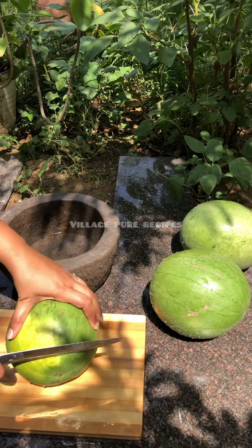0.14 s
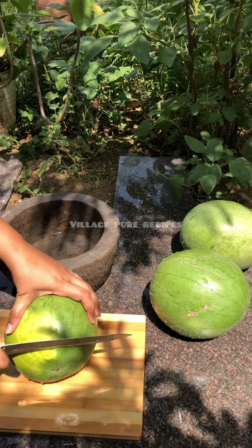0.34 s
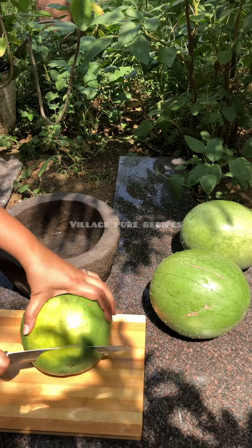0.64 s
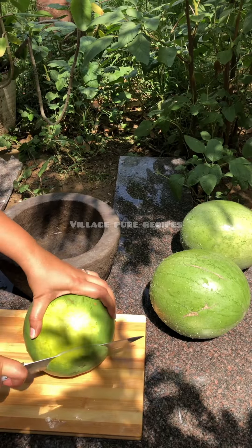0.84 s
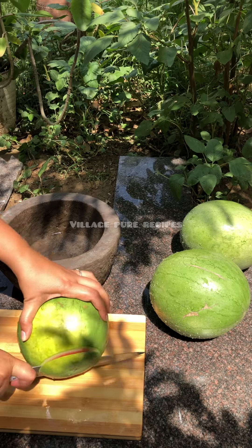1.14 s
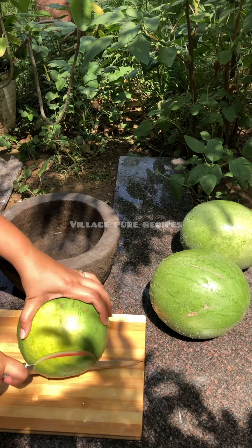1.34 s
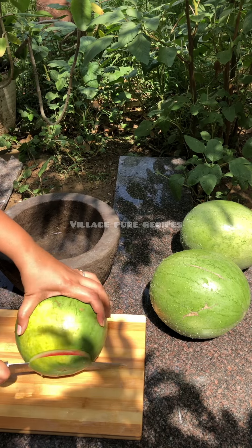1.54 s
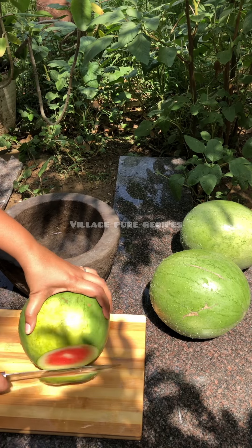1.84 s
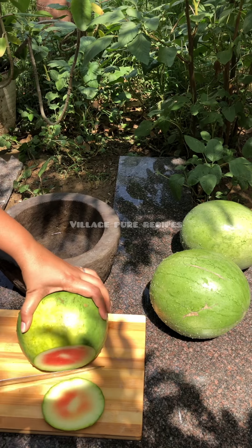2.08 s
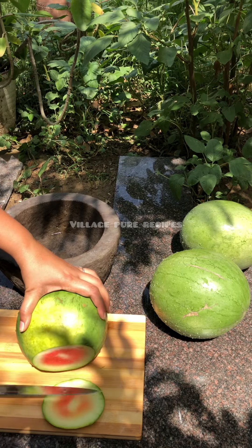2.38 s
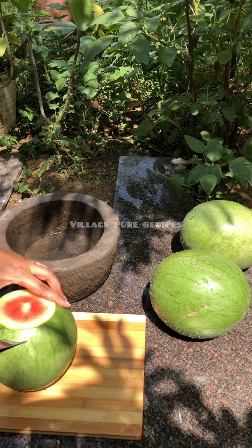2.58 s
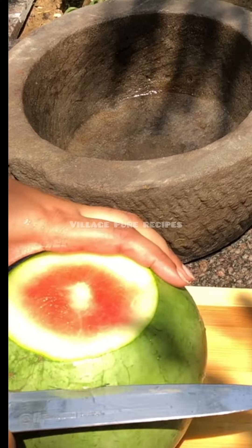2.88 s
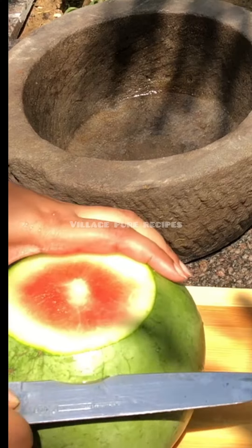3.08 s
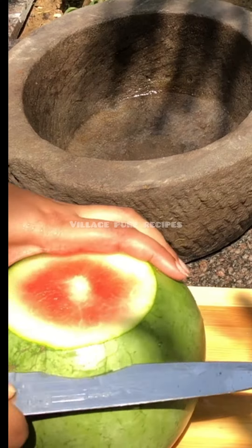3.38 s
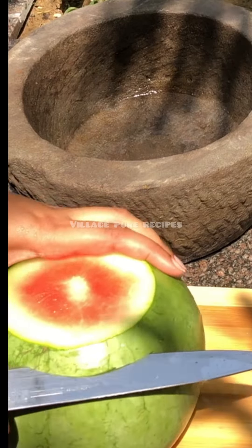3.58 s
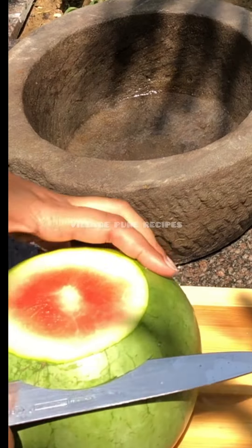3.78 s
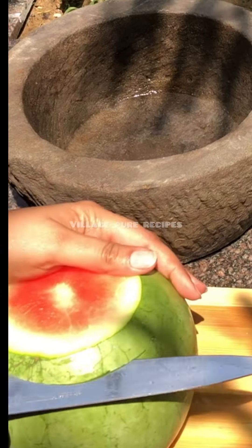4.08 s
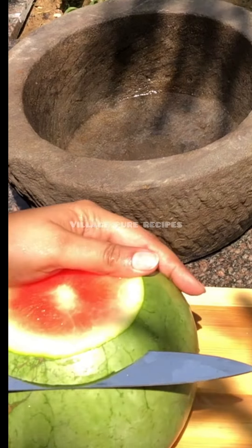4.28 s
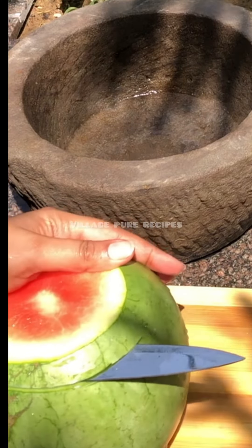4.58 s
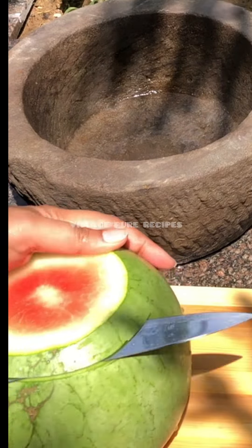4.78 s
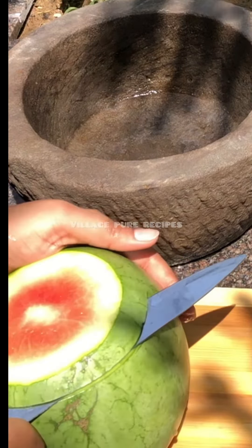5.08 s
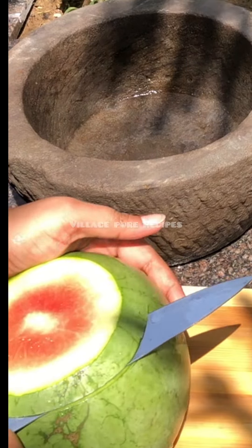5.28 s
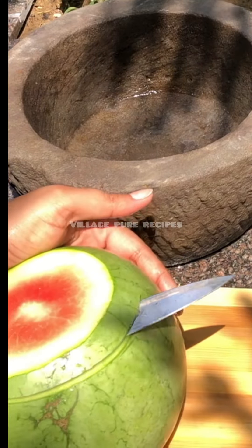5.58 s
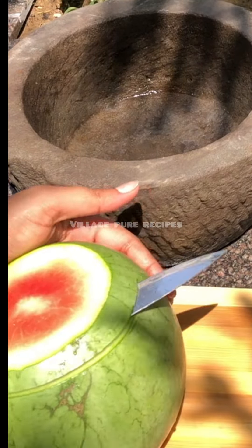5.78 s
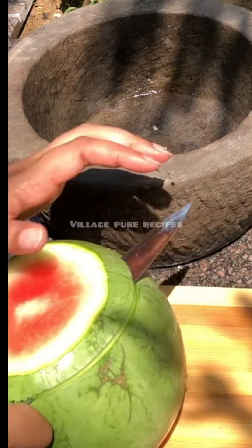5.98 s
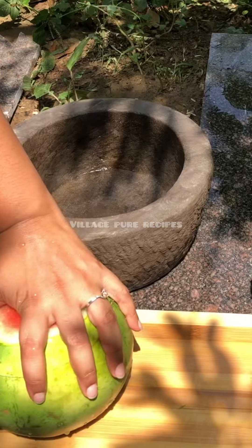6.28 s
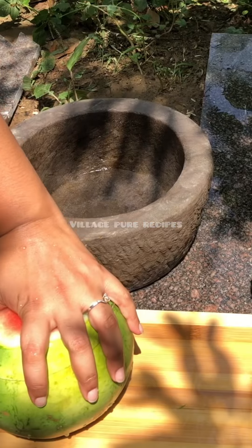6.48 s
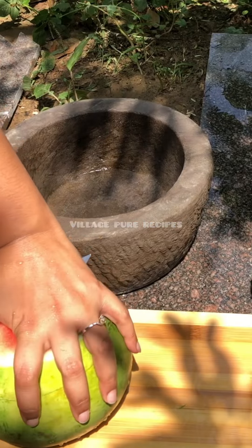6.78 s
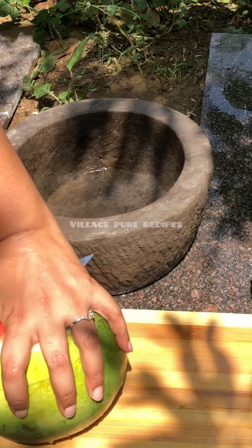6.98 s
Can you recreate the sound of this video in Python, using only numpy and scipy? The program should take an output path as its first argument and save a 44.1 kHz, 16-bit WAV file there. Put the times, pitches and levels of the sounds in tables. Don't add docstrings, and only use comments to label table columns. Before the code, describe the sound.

Outdoors in a garden, a close microphone catches a knife sawing melon rind in faint dry crackles. Near two seconds the blade slams onto a wooden board with a hard, bright crack, scatters briefly off walls and leaves, and bounces once. Softer scrapes and hollow melon knocks follow. A pump hums and coasts down, a distant engine throbs, and a near bird rasps at the end. Abrupt scene cuts leave tiny gaps.

```python
import sys
import numpy as np
from scipy import signal
from scipy.fft import rfft, irfft, next_fast_len
from scipy.io import wavfile
from scipy.ndimage import map_coordinates

SR = 44100
rng = np.random.default_rng(int(sys.argv[2]) if len(sys.argv) > 2 else 0)


def attenuation_scalar(level_db):
    decades = np.asarray(level_db, float) / 20
    return 10 ** decades


def to_wav(sig):
    pcm = np.clip(np.atleast_2d(sig), -1, 1) * 32767
    pcm = np.round(pcm).astype(np.int16)
    wavfile.write(sys.argv[1], SR, pcm.T)


N = 314785


def at_hz(points, hz):
    point_hz, db = np.transpose(points)
    return np.interp(np.log(hz), np.log(point_hz), db)


def in_time(rows, outside=None):
    s, *columns = np.transpose(rows)
    return [np.interp(np.arange(N) / SR, s, c, outside, outside) for c in columns]


def coloured(x, gain_at):
    size = next_fast_len(len(x))
    hz = np.maximum(np.fft.rfftfreq(size, 1 / SR), 1)
    y = irfft(rfft(x, size) * gain_at(hz), size)[:len(x)]
    return y / np.sqrt(np.mean(y ** 2))


def band_pass(x, order, low_hz, high_hz):
    return signal.sosfilt(signal.butter(order, [low_hz, high_hz], "band", fs=SR, output="sos"), x)


def drift(rate_hz):
    steps = np.arange(0, N + 64, 64)
    slow = map_coordinates(rng.standard_normal(600), [steps / SR * rate_hz * 2 % 590], order=3)
    return np.interp(np.arange(N), steps, slow)


def ring(push, hz, t60):
    radius, angle = attenuation_scalar(-60 / (t60 * SR)), 2 * np.pi * hz / SR
    return signal.lfilter([0, np.sin(angle)], [1, -2 * radius * np.cos(angle), radius ** 2], push + 1e-18)


# loudest at in seconds, length in seconds, level in dB,
# tilt in dB per octave.
KNIFE_STROKES = [(0.523, 0.059, -67.5, -2.5), (.65, 0.053, -74.5, -2), (0.807, 0.1, -64.5, -1.5),
                 (0.973, 0.067, -72, -5), (1.112, 0.069, -55, 1), (1.154, 0.052, -53.5, 0.5),
                 (1.622, 0.11, -65, -4.5), (1.693, 0.07, -57, 0), (1.79, .14, -74, 0), (1.853, .03, -69, 2),
                 (1.869, 0.005, -47, -4), (2.667, .025, -71, -1), (3.139, 0.063, -78, -4.5),
                 (3.445, 0.05, -62, -2.5), (3.62, .056, -63.5, -2), (4.128, 0.06, -66, -3),
                 (4.165, 0.05, -55, -.3), (4.577, 0.075, -57.5, -1), (4.78, 0.04, -75.5, -4),
                 (5.323, 0.087, -67, -0.5), (5.438, 0.13, -70.5, -2), (5.509, 0.036, -62.5, -0.5),
                 (5.599, 0.075, -58.5, -1.5), (5.941, .03, -72.5, -2), (6.161, 0.079, -71, -4),
                 (6.25, 0.071, -72.5, -6), (6.308, .032, -67.5, -3)]
# frequency in Hz, density in dB per Hz.
RIND_RASP = [(410, -36), (700, -9), (886, -7.5), (1620, -1), (2000, -9), (2300, -2.5), (3030, -3),
             (3690, -2.5), (4860, -4.5), (8530, -13.5), (16000, -29.5)]
FIRM_DB, FIRM_LOW_HZ, THIN_OCTAVES_PER_DB = -63, 1040, 0.27
RISE_SHARE = .52
HOLLOWS_DB = 1.6


def strokes():
    size_db = 2.4 * np.minimum(rng.exponential(1, N), 3.5) + .9 * drift(55)
    sizes = attenuation_scalar(size_db) * rng.choice([-1, 1], N)
    cells = sizes * (rng.random(N) < 7000 / SR)
    out, u = np.zeros(N), np.arange(-8000, 8000) / SR
    for s, length, db, tilt_db in KNIFE_STROKES:
        hollows = rng.standard_normal(40)
        low_hz = FIRM_LOW_HZ * 2 ** (THIN_OCTAVES_PER_DB * max(FIRM_DB - db, 0))

        def rind_gain(hz):
            ripple_db = HOLLOWS_DB * np.interp(5 * np.log2(hz / 300), np.arange(40), hollows)
            colour_db = at_hz(RIND_RASP, hz) + ripple_db + tilt_db * np.log2(hz / 3500)
            return attenuation_scalar(colour_db) / np.sqrt(1 + (low_hz / hz) ** 4)

        span = slice(int(s * SR) - 8000, int(s * SR) + 8000)
        swell = np.exp(-(u / np.where(u < 0, RISE_SHARE * length, (1 - RISE_SHARE) * length)) ** 2)
        out[span] += attenuation_scalar(db) * swell * coloured(cells[span], rind_gain)
    return out


# start in seconds, peak in dB, body pitch in Hz,
# contact length in seconds, edge in dB per octave.
MELON_ROCKS = [
    (3.433, -52.5, 428, 0.036, -8.5),
    (3.6, -47, 427, 0.042, -4),
    (4.093, -49, 431, 0.069, -1),
    (4.168, -52.5, 398, 0.033, -1),
    (4.394, -60.5, 440, 0.029, -3.5),
    (4.547, -46.5, 406, 0.035, -10.5),
    (4.583, -50.5, 440, 0.038, -7),
    (5.147, -59, 379, 0.012, -3),
    (5.608, -43, 427, 0.024, -4),
    (5.728, -70.5, 398, 0.0069, -0.5),
]
# ratio to the body pitch, level in dB, t60 in seconds.
MELON_MODES = [(.58, -12.5, 0.12), (.88, -21.5, 0.039), (1.0, 5, 0.17), (1.27, -15, .035), (1.52, 3, 0.032),
               (1.95, -29, .025), (2.7, -15, .015)]


def rocks():
    out, t = np.zeros(N), np.arange(8000) / SR
    for s, db, body_hz, length, edge_db in MELON_ROCKS:
        push = rng.standard_normal(8000) * np.sin(np.pi * np.clip(t / length, 0, 1))
        tone = 0
        for ratio, mode_db, t60 in MELON_MODES:
            tone = tone + attenuation_scalar(mode_db + edge_db * np.log2(ratio)) * ring(push, ratio * body_hz, t60)
        out[int(s * SR):int(s * SR) + 8000] += attenuation_scalar(db) * tone / np.abs(tone).max()
    return out


SLAM_CONTACTS = [
    1.877483,
    1.878186,
    1.880544,
    1.88102,
    1.883673,
    1.886803,
    1.889728,
]
# blade in dB, board edge in dB, board middle in dB.
SLAM_STRENGTHS = [(-7, -11.5, -85), (-9, -11.5, -25), (-85, -5.5, -.5), (-40.5, -14, -55),
                  (-78, -19.5, -19), (-37.5, -71, -23), (-42, -37, -21)]
# frequency in Hz, level in dB, t60 in seconds.
BLADE_MODES = [(1600, -12.5, .0091), (1990, -8, .0091), (3030, 5.5, .0023), (4950, 9.5, .0091),
               (6240, .5, .0091), (6840, -11, .0071), (7440, -6.5, .0069), (8790, -6, .0035),
               (11160, -17, .006)]
# frequency in Hz, level in dB, t60 in seconds.
BOARD_EDGE_MODES = [(1630, -11.5, .02), (2520, -10.5, .02), (2750, -5.5, .026), (2960, -15.5, .0157)]
# frequency in Hz, level in dB, t60 in seconds.
BOARD_MIDDLE_MODES = [(450, -26, .06), (600, -21, 0.05), (830, -1, 0.0145), (1150, -27, 0.045)]


def slam():
    at, out = np.round(np.array(SLAM_CONTACTS) * SR).astype(int), np.zeros(N)
    blade_db, edge_db, middle_db = np.transpose(SLAM_STRENGTHS)
    # modes, strength in dB, softness of the contact, direction of the push
    parts = [(BLADE_MODES, blade_db, .49, -1),
             (BOARD_EDGE_MODES, edge_db, .35, 1),
             (BOARD_MIDDLE_MODES, middle_db, .785, 1)]
    for modes, strength_db, soft, way in parts:
        for hz, db, t60 in modes:
            clicks = np.zeros(N)
            clicks[at] = way * attenuation_scalar(strength_db + db)
            push = signal.lfilter([(1 - soft) ** 2], [1, -2 * soft, soft ** 2], clicks)
            out += ring(push, hz, t60)
    return band_pass(out, 2, 400, 10500)


# start in seconds, level in dB, frequency in Hz, t60 in seconds.
KNOCK_MODES = [(1.9719, -27, 2850, .007), (1.9719, -29, 3750, .006), (1.9725, -35, 3150, .006),
               (1.9722, -29, 2300, .013), (1.9737, -30, 1900, .009), (1.9724, -37, 5960, .007),
               (1.9726, -42, 5160, .01), (1.9724, -40, 7560, .005), (1.9722, -36, 10500, .004),
               (1.9726, -47, 9300, .008), (1.9724, -45, 13000, .004), (1.9749, -31, 468, .04),
               (1.975, -33, 834, .03), (1.974, -41, 1400, .02), (3.9372, -55, 3700, .014),
               (3.9378, -56, 2100, .014), (3.9403, -49, 2630, .013), (3.9403, -54, 1440, .014),
               (3.9443, -41, 440, .03), (3.9443, -43, 760, .016), (5.6105, -43, 430, .08),
               (5.6105, -47, 650, .035), (5.612, -48, 270, .07)]


def knocks():
    out = np.zeros(N)
    for s, db, hz, t60 in KNOCK_MODES:
        push = np.hanning(int(SR / hz / 3) + 3)
        push = np.pad(push / push.sum(), (0, 3000 - len(push)))
        out[int(s * SR):int(s * SR) + 3000] += attenuation_scalar(db) * ring(push, hz, t60)
    return out


# start in seconds, peak in dB, lowest Hz, highest Hz.
LIGHT_TOUCHES = [(1.668, -49, 3000, 10000), (1.703, -52, 2500, 9000), (1.721, -49.5, 2500, 8000),
                 (1.74, -51, 2500, 6000), (1.855, -44, 1800, 6000), (1.8668, -37, 1800, 3200),
                 (1.0748, -54, 6000, 8600), (1.1148, -48, 3000, 9000), (1.136, -48, 1500, 7000),
                 (3.929, -58, 1400, 3200), (2.0735, -57.5, 4600, 5400), (2.079, -43, 448, 1100),
                 (5.399, -49.5, 367, 600), (5.916, -48, 700, 1250), (5.919, -49, 377, 522),
                 (5.974, -51.5, 448, 1296), (5.61, -54, 2200, 2800)]


def ticks():
    out, t = np.zeros(N), np.arange(3000) / SR
    snap = 3.8 * (np.arange(3000) == 30)
    for s, db, low_hz, high_hz in LIGHT_TOUCHES:
        t60 = .024 * (low_hz * high_hz / 1e6) ** -.25
        grit = rng.standard_normal(3000) * np.minimum(t / .0012, 1) * attenuation_scalar(-60 * t / t60)
        puff = band_pass(grit + snap, 3, low_hz, high_hz)
        out[int(s * SR):int(s * SR) + 3000] += attenuation_scalar(db) * puff / np.abs(puff).max()
    return out


# frequency in Hz, level in dB.
YARD_COLOUR = [(180, -40.5), (300, -5), (801, -3.5), (946, -3.5), (1210, -3.5), (1680, -10), (2520, -7),
               (3640, -18.5), (4750, -18), (5700, -20.5), (6850, -20.5), (8220, -28), (16000, -44.5)]
# frequency in Hz, t60 in seconds.
YARD_T60 = [(300, 0.38), (1000, .4), (3000, .3), (5000, 0.42), (7500, 0.25), (12000, .14)]
# frequency in Hz, width in Hz, lift in dB.
LINGERING = [(404, 70, 3), (813, 30, 4), (1010, 30, 6), (1200, 40, 5), (1450, 60, 4), (1900, 50, 4),
             (2130, 35, 5), (2430, 45, 2), (3050, 60, 4), (3980, 45, 4), (4730, 70, 4), (5080, 45, 3),
             (5380, 30, 6), (6010, 35, 7)]


def wash(s, db, rise):
    t, out = np.arange(30000) / SR, 0
    for hz in 300 * 2 ** np.arange(0, 6, .5):
        def band_gain(f):
            return attenuation_scalar(at_hz(YARD_COLOUR, f)) * np.exp(-(np.log2(f / hz) / .3) ** 2)

        band = coloured(rng.standard_normal(30000), band_gain)
        fade_db = -60 * t / at_hz(YARD_T60, hz)
        out = out + band * attenuation_scalar(at_hz(YARD_COLOUR, hz) + fade_db) * np.sqrt(hz / 1000)
    ripple_db = 1.5 * rng.standard_normal(200)

    def linger_gain(f):
        lift_db = sum(lift / (1 + (2 * (f - hz) / width) ** 2) for hz, width, lift in LINGERING)
        return attenuation_scalar(np.interp(f / 130, np.arange(200), ripple_db) + lift_db)

    out = np.std(out) * coloured(out, linger_gain)
    out = attenuation_scalar(db) * out * np.clip(t / rise, 0, 1) * (t < .5)
    return np.pad(out, (int(s * SR), N))[:N]


# time in seconds, pitch in Hz, level in dB.
LOW_VOICE = [(6.346, 1704, -84), (6.355, 1830, -65), (6.366, 2008, -60), (6.385, 2580, -54.5),
             (6.42, 2850, -62), (6.445, 2640, -55.5), (6.465, 2180, -55.5), (6.49, 1916, -70),
             (6.53, 1742, -91)]
# time in seconds, pitch in Hz, level in dB.
HIGH_VOICE = [(6.356, 3680, -72), (6.366, 3950, -49), (6.418, 3850, -68), (6.43, 3550, -50),
              (6.455, 3470, -58.5), (6.478, 3850, -50), (6.51, 3590, -61), (6.55, 3440, -73),
              (6.58, 3450, -90)]
# frequency in Hz, gain in dB.
THROAT = [(1700, -6), (2700, 1), (3500, 2.5), (4000, 0.5), (4900, -1.5), (5200, -9), (5600, -18),
          (6100, -9), (7000, -24), (10000, -26)]


def bird():
    call, on = 0, in_time([(6.34, 1), (6.6, 1)], outside=0)[0]
    # voice, overtone levels in dB, rasp as phase jitter in radians
    voices = [(LOW_VOICE, (0.5, 2.5, 0.0, -1), .5), (HIGH_VOICE, (-3, -10), .75)]
    for rows, overtones_db, rasp in voices:
        hz, db = in_time(rows)
        jitter = coloured(rng.standard_normal(N), lambda f: 1 / (1 + (f / 500) ** 4))
        turn = 2 * np.pi * np.cumsum(hz) / SR + rasp * jitter
        for k, overtone_db in enumerate(overtones_db, 1):
            call = call + on * attenuation_scalar(db + overtone_db + at_hz(THROAT, k * hz)) * np.sin(k * turn)
    t = np.arange(30000) / SR
    leaves = rng.standard_normal(30000) * attenuation_scalar(-60 * t / 0.5) / np.sqrt(SR * 0.031)
    scatter = attenuation_scalar(3.0) * signal.fftconvolve(call, leaves)[:N]
    wall_echo = attenuation_scalar(-9) * np.roll(call, int(.092 * SR))
    return signal.lfilter(*signal.iirnotch(3050, 4.0, fs=SR), call + wall_echo + scatter)


# start in seconds, length in seconds, first pitch in Hz,
# blur in Hz, level in dB.
FAR_CALLS = [(0.419, .065, 744, 40, -63.5), (0.935, 0.059, 4600, 700, -72), (1.044, 0.051, 7800, 910, -76),
             (1.097, .033, 3820, 70, -55), (1.575, .053, 6900, 1200, -72), (2.654, 0.024, 5630, 300, -74),
             (3.11, 0.055, 3470, 499, -68.5), (3.69, 0.1, 5400, 900, -73), (5.299, 0.096, 4720, 1206, -75),
             (5.4, 0.16, 4440, 595, -72), (5.488, .045, 4030, 1004, -64), (5.575, 0.042, 4450, 450, -62),
             (6.035, 0.065, 668, 35, -66), (4.044, .14, 665, 50, -67), (4.155, .025, 1620, 80, -60),
             (5.78, 0.072, 4130, 898, -79), (1.635, 0.1, 2500, 280, -63), (1.64, .09, 3950, 400, -68)]


def chirps():
    out = np.zeros(N)
    for s, length, first_hz, blur_hz, db in FAR_CALLS:
        u = np.arange(12000) / SR / length
        blur = signal.butter(2, blur_hz, fs=SR, output="sos")
        re, im = signal.sosfilt(blur, rng.standard_normal((2, 12000))) * np.sqrt(SR / blur_hz / 2)
        hz = first_hz * (1 - .032 * np.minimum(u, 1))
        turn = 2 * np.pi * np.cumsum(hz) / SR
        shape = np.clip(5 * u, 0, 1) * attenuation_scalar(-40 * np.maximum(u - .7, 0))
        i = int(s * SR)
        out[i:i + 12000] += attenuation_scalar(db) * shape * (re * np.cos(turn) + im * np.sin(turn))
    return out


# on in seconds, power off in seconds,
# hum in dB, octave in dB, coasting fade in dB per second.
PUMP_RUNS = [
    (0, 0.241, -51.5, -67.5, 0),
    (.9, 4.5, -52.5, -63.5, 23),
    (2.4815, 2.36, -47.5, -68.5, 27),
    (2.8265, 5.13, -52, -59.5, 43),
    (6.103, 12.0, -51.5, -58.5, 30.5),
]
MAINS_HZ, RESIDUE_DB = 99.8, -71
SPIN_UP_S, COAST_SAG_HZ, COAST_S, OCTAVE_FADE_DB_PER_S = 0.082, 13.1, 0.16, 87


def pump():
    clock, flutter = np.arange(N) / SR, attenuation_scalar(1.7 * drift(15))
    starts, ends = np.r_[0, SCENE_CHANGES], np.r_[SCENE_CHANGES, N / SR]
    mains = 2 * np.pi * MAINS_HZ * clock
    out = attenuation_scalar(RESIDUE_DB) * (np.sin(mains) + np.cos(2 * mains))
    for on, off, hum_db, octave_db, fade_db in PUMP_RUNS:
        span = slice(int(on * SR), int(ends[ends > on + .05][0] * SR))
        t, wobble = clock[span], flutter[span]
        coast = np.maximum(t - off, 0)
        sag_hz = COAST_SAG_HZ * (1 - np.exp(-coast / COAST_S))
        turn = mains[span] - 2 * np.pi * np.cumsum(sag_hz) / SR
        twelfth = attenuation_scalar(-25.5) * np.sin(3 * turn)
        tone = attenuation_scalar(hum_db - fade_db * coast) * (wobble * np.sin(turn) + twelfth)
        octave_level = attenuation_scalar(octave_db - OCTAVE_FADE_DB_PER_S * coast) / wobble
        tone += octave_level * np.cos(2 * mains[span])
        if np.abs(on - starts).min() > .05:
            tone *= np.clip((t - on) / SPIN_UP_S, 0, 1)
        out[span] += tone
    return np.sqrt(2) * out


# time in seconds, firing rate in Hz.
FIRING_RATE = [(.5, 24.6), (2.48, 24.6), (2.49, 24.9), (2.82, 25.7), (2.83, 26.7), (4.3, 27.4), (5.3, 27.9),
               (5.85, 28.1), (6.1, 28.1)]
# time in seconds, level in dB, order it favours.
FAR_PATH = [(.75, -50, 6), (1.0, -49.5, 5), (1.14, -51, 6.3), (1.35, -51.5, 7.8), (1.57, -49, 8.6),
            (1.78, -51, 6), (1.92, -49, 7.5), (2.15, -50.5, 6.6), (2.42, -48.5, 6.2), (2.55, -55, 5.6),
            (2.78, -52, 6), (2.86, -61, 6), (3.4, -60, 5.8), (4.08, -64, 3.8), (4.25, -58.5, 6),
            (5.2, -55, 6.4), (5.87, -58.5, 7), (6.09, -67, 8)]
# multiple of the firing rate, level in dB,
# extra loss per dB of distance.
LOUD_ORDERS = [(5, -1, -0.06), (6, -1.5, -0.17), (7, -2.5, 0.4), (8, 0.5, 0.05), (9, 3, 2.85)]
# multiple of the firing rate, level in dB.
FAINT_ORDERS = [(2, -67.5), (3, -71), (10, -72.5), (11, -73), (12, -72), (14, -73.5)]


def engine():
    (hz,), (level_db, favoured) = in_time(FIRING_RATE), in_time(FAR_PATH)
    turn = 2 * np.pi * np.cumsum(hz) / SR

    def order_tone(k, db, wander_db):
        return attenuation_scalar(db + wander_db * drift(4.5)) * np.sin(round(k) * turn + rng.uniform(0, 2 * np.pi))

    out = 0
    for k, db, far in LOUD_ORDERS:
        loss_db = np.minimum(4.5 * (round(k) - favoured) ** 2, 8.5)
        out = out + order_tone(k, level_db + db + far * (level_db + 47) - loss_db, 1.5)
    for k, db in FAINT_ORDERS:
        out = out + order_tone(k, db + 1.3 * (level_db + 51.5), 3.4)
    t = np.arange(N) / SR
    return np.sqrt(2) * out * (t > SCENE_CHANGES[0]) * (t < SCENE_CHANGES[-1])


# rumble in dB, murmur in dB, hiss in dB,
# murmur drift in dB per second.
AIR_LEVELS = [
    (-56.5, -55.5, -74, -9.5),
    (-67, -57, -73.5, 0),
    (-70, -62.5, -75, 5.5),
    (-72, -62.5, -75, -0.19),
    (-68.5, -61, -75.5, -1),
]
# frequency in Hz, density in dB per Hz.
AIR_SPECTRUM = [(15, -57.5), (28, -27), (50, -12), (90, -6.5), (160, -10.5), (240, -16), (400, -20.5),
                (700, -27), (1300, -32), (2000, -37), (5000, -44), (9000, -49.5), (14800, -56),
                (16200, -75.5)]
# frequency in Hz, width in Hz, level in dB.
HOLLOW_TONES = [(650, 58, -74), (826, 56, -74), (1190, 130, -74)]


def air():
    t = np.arange(N) / SR
    view = np.searchsorted(SCENE_CHANGES, t)
    rumble_db, murmur_db, hiss_db, slope_db = np.array(AIR_LEVELS)[view].T
    rumble_db = rumble_db + drift(1.2)
    murmur_db = murmur_db + slope_db * (t - np.r_[0, SCENE_CHANGES][view])
    bands = [(10, 130, rumble_db, 3.0), (130, 1700, murmur_db, 1.2), (1700, 20000, hiss_db, .6)]
    out = 0
    for low, high, level_db, breath_db in bands:
        def band_gain(hz):
            return attenuation_scalar(at_hz(AIR_SPECTRUM, hz)) / np.sqrt((1 + (low / hz) ** 6) * (1 + (hz / high) ** 6))

        noise = coloured(rng.standard_normal(N), band_gain)
        out = out + attenuation_scalar(level_db + 2.0 + breath_db * drift(6.5)) * noise
    for centre_hz, width, db in HOLLOW_TONES:
        tone = coloured(rng.standard_normal(N), lambda hz: 1 / (1 + ((hz - centre_hz) / width) ** 2))
        out = out + attenuation_scalar(db + murmur_db + 56 + 1.5 * drift(2.5)) * tone
    return out


def scene():
    knife = strokes() + rocks() + slam() + knocks() + ticks()
    knife = knife + wash(1.879, -37, rise=.008)
    knife = knife + wash(1.972, -50, rise=.049)
    knife = band_pass(knife, 2, 140, 15500)
    far = pump() + engine() + air()
    return (knife + bird() + chirps() + far)[None]


def roll_off(x):
    return signal.sosfilt(signal.butter(12, 16840, fs=SR, output="sos"), x)


SCENE_CHANGES = [
    .4985,
    2.4815,
    2.8265,
    6.104,
]


def record(dry):
    t, gate = np.arange(N) / SR, np.ones(N)
    for s in SCENE_CHANGES:
        fade_out = np.clip((s - t) / 0.0018, 0, 1)
        fade_in = np.clip((t - s) / 0.02, 0, 1)
        gate *= np.where(t < s, fade_out, fade_in)
    mix = 1.375 * np.tanh(dry * gate / 1.435)
    return roll_off(mix)


dry = scene()
out = record(dry)
to_wav(out)
```